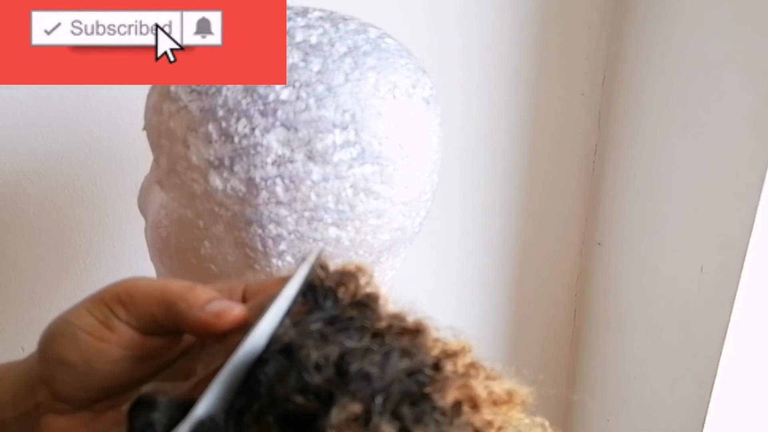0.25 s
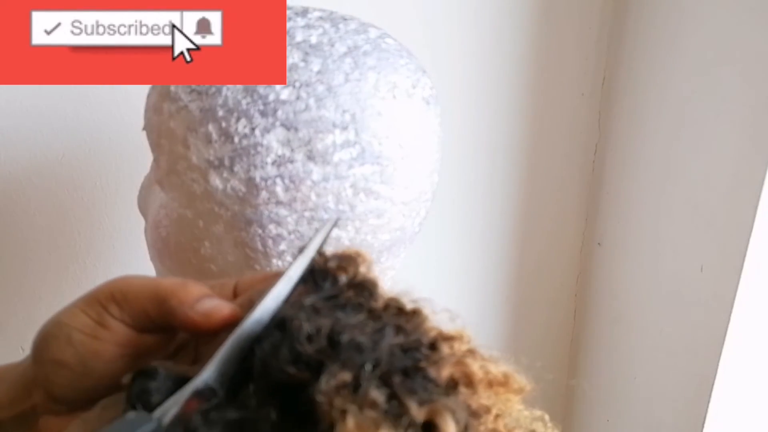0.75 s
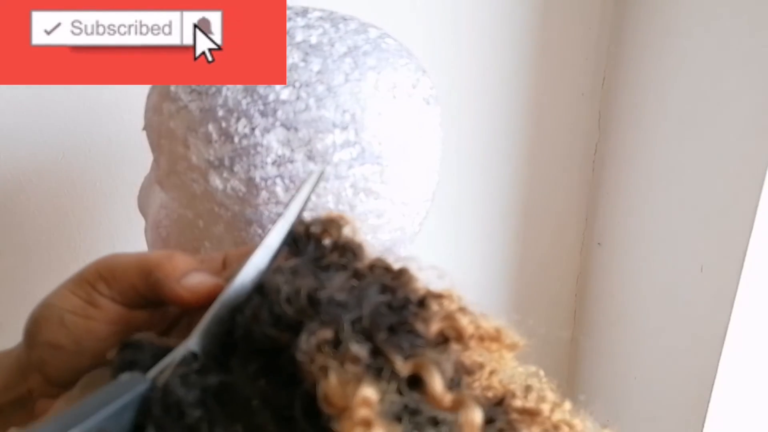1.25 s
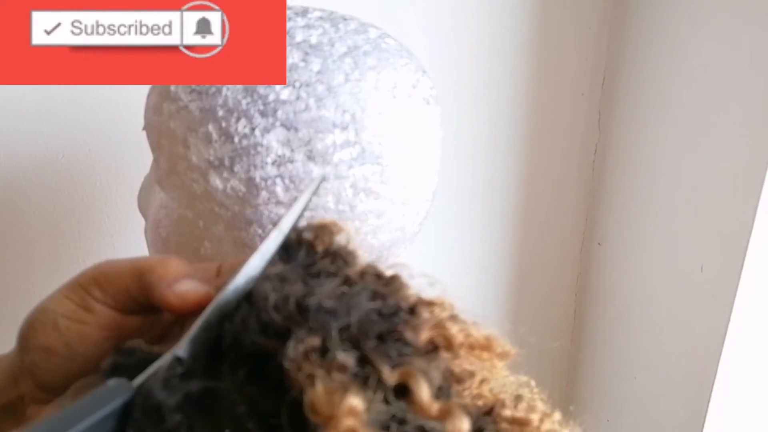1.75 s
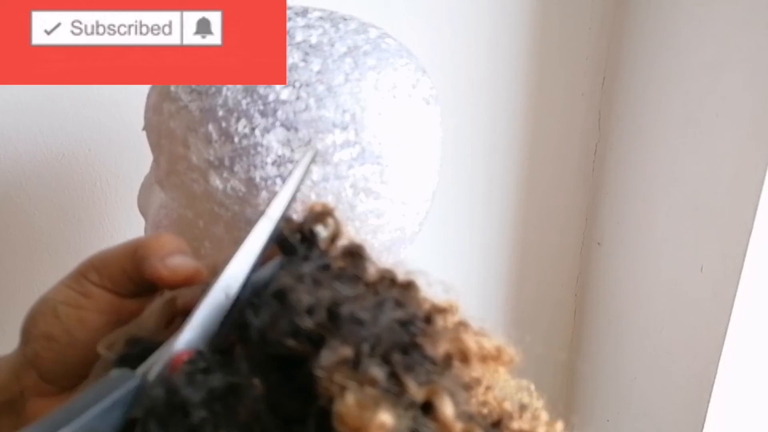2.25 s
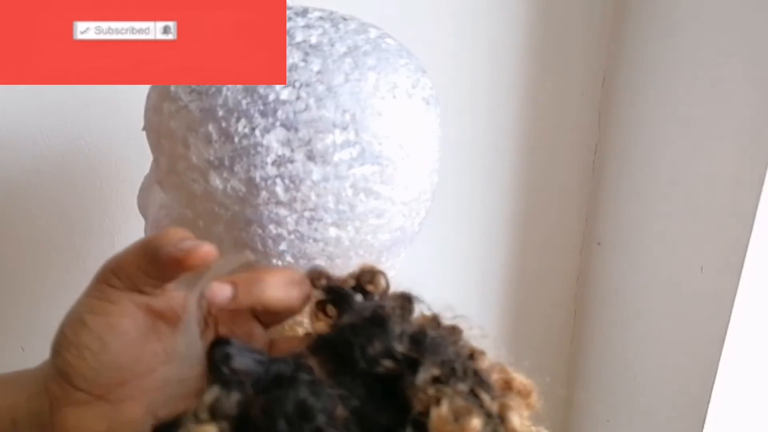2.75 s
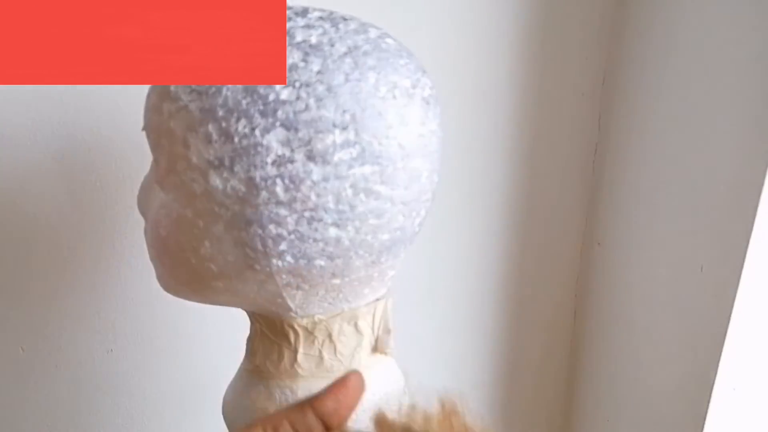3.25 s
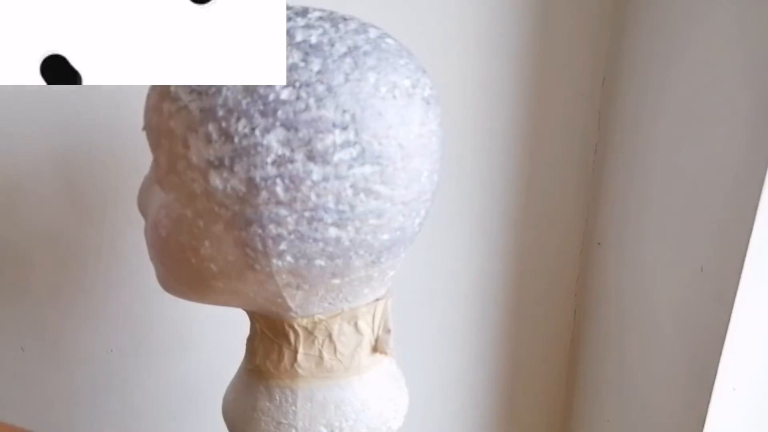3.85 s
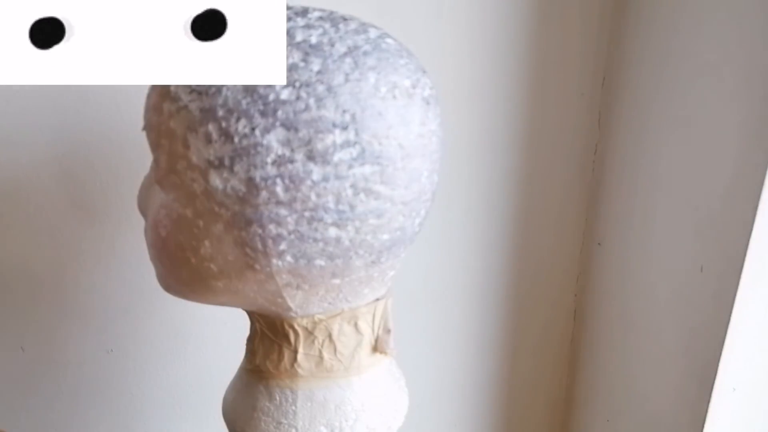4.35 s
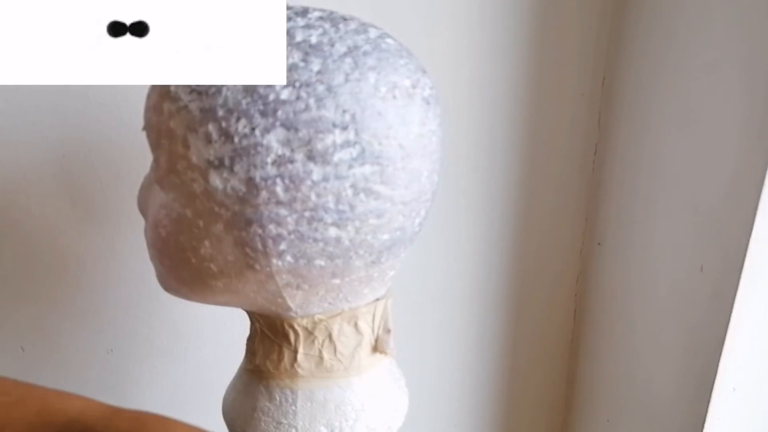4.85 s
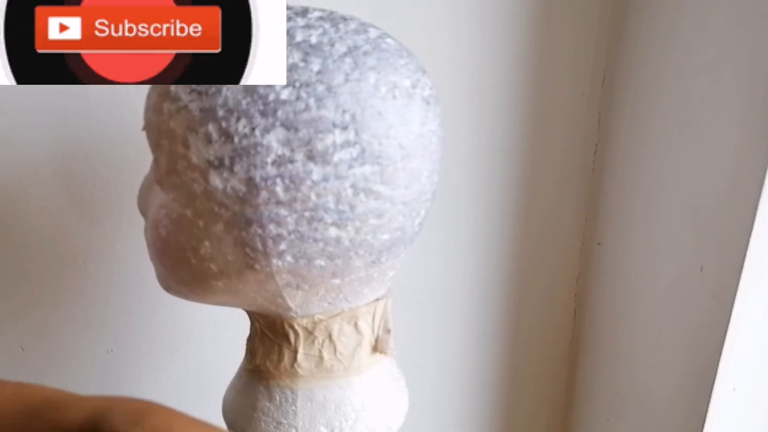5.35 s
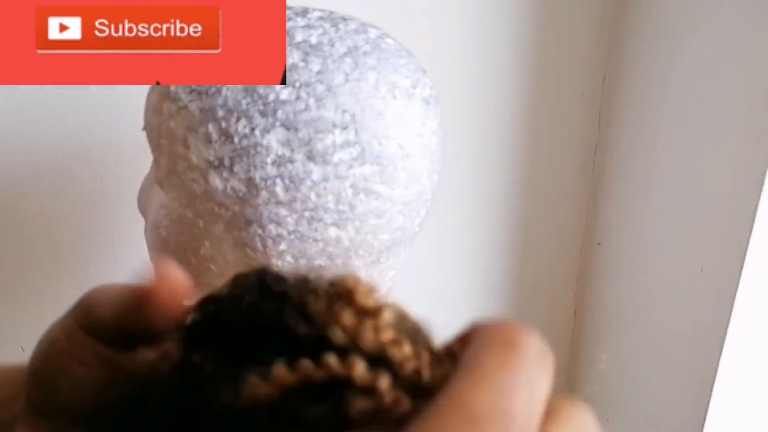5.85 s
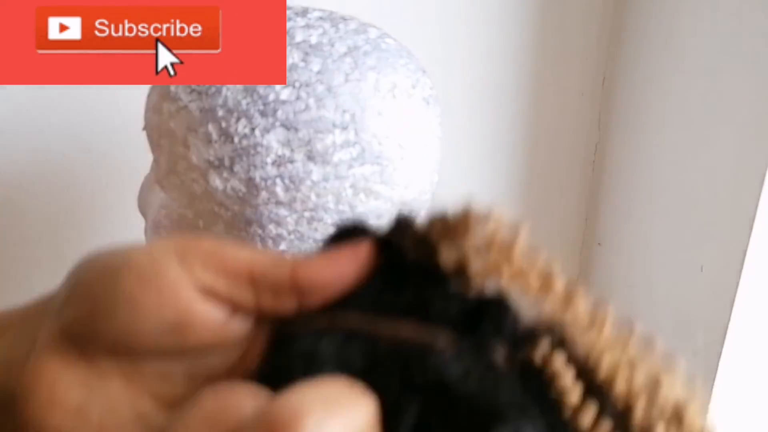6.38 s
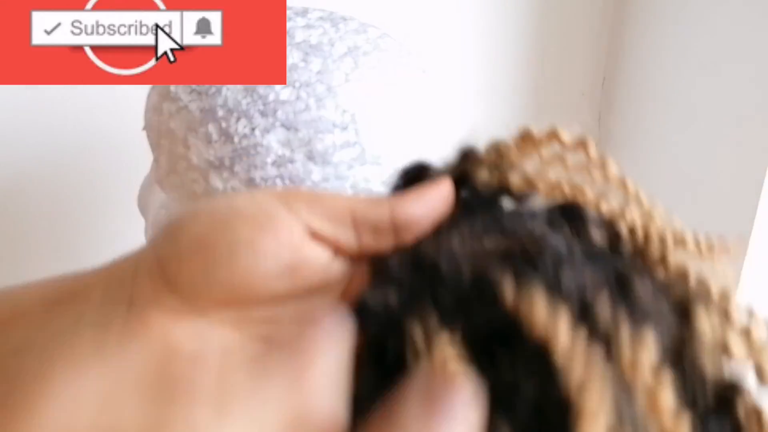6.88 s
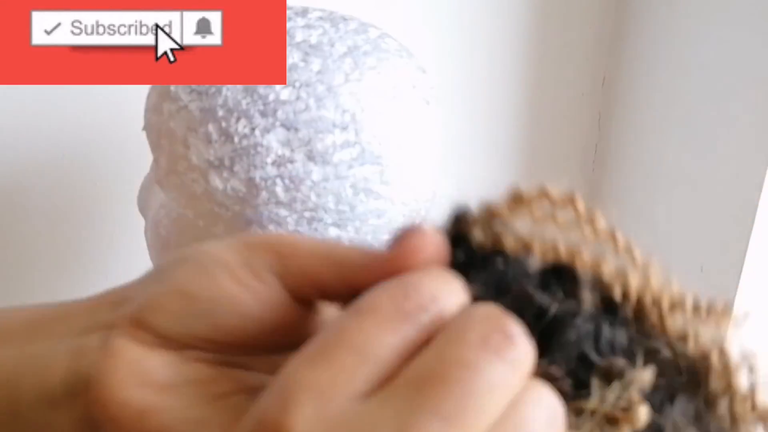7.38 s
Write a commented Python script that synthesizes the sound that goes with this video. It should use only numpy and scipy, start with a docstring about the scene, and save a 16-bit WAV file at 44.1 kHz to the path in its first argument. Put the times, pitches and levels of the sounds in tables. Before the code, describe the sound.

A quiet bare room holds a faint low rumble and even hiss, heard closely through a phone's two microphones. From 0 to 0.3 seconds hands rub softly, with a hollow scuff. Between 0.5 and 1.95 scissors nibble at lace: faint, dry treble crackles, small clicks and a brighter tick near 1.25, among dull scuffs and low bumps. At about 2.05-2.1 comes a far louder, sharp metallic snip. Airy hair rustles swell from 2.4 to 3.4, with a small click at 3.36, then near stillness. At 4.5 the scissors touch a hard top, chattering and skidding until 4.8; the hardest knock lands at 4.94, with two more just after, steel ringing over a low wooden-like boom. The ring fades. A light hair swish at 5.85 and soft strokes from 6.5 to 7.5 grow duller, with lace rubbing.

```python
"""Quiet, bare room: scissors trim the lace of a curly wig close to a phone.
Bites are crackle runs through treble blade resonances; thread snaps and pivot ticks are short clicks.
The scissors land on a hard top: chattering knocks ring steel modes, skids crackle, board modes boom.
Hands scuff, shift and stroke the wig: hollow rubs, low bumps, swells of hair and lace crackle.
Rumble and hiss lie beneath; the two microphone ports differ in treble resonance."""
import sys
import numpy as np
from scipy import signal
from scipy.fft import rfft, irfft, next_fast_len
from scipy.io import wavfile

SR = 44100
rng = np.random.default_rng(int(sys.argv[2]) if len(sys.argv) > 2 else 0)


def transcribe(signal):
    """Save signal, clipped to [-1, 1], as a 16-bit WAV file at the path in sys.argv[1]."""
    frames = np.atleast_2d(signal).T
    limited = np.clip(frames, -1, 1)
    pcm = np.round(limited * 32767).astype(np.int16)
    wavfile.write(sys.argv[1], SR, pcm)


N = 335953

# All table levels are relative: mix gains follow.
# blade bites through lace: (time [s], length [s], level [dB], most excited frequency [Hz])
BITES = [(.745, 0.026, -55, 6530), (0.872, 0.1155, -45.5, 8040), (1.055, .017, -50, 8700),
         (1.237, 0.0452, -49.5, 12000), (1.442, 0.089, -53, 8900), (1.546, .03, -46.5, 8560),
         (1.625, .035, -40.5, 8700), (1.915, 0.0553, -51, 8800), (2.059, 0.0397, -25, 6670),
         (2.114, 0.0159, -26.5, 6800)]
# thread snaps and pivot ticks: (time [s], level [dB], most excited frequency [Hz])
TICKS = [(0.5235, -54, 8000), (0.7565, -46.5, 6200), (0.8189, -51.5, 7470), (0.9493, -38, 8550),
         (1.226, -50, 7900), (1.2591, -31.5, 14480), (1.6526, -42.5, 9500), (2.0593, -27, 6550),
         (2.0904, -21.5, 6900), (2.3718, -43.5, 9100), (3.3606, -33.5, 5400), (6.7591, -48, 12000)]
# blade resonances: (frequency [Hz], width [Hz], level [dB])
BLADE_MODES = [(5410, 107, 3.5), (6230, 146, 11.5), (6750, 350, 7), (8136, 336, 0.5), (8667, 317, 2.5),
               (9364, 337, -21.5), (10170, 130, -14.5), (11270, 140, -12.5), (13563, 696, -18),
               (14670, 300, -8), (15260, 228, -8.5)]
# scissors meeting the hard top: (time [s], knock [dB], skid [dB], thud [dB])
BLOWS = [(4.5158, -22.5, -26, -45.5), (4.5692, -29.5, -38, -42), (4.647, -39.5, -39, -43.5),
         (4.7514, -30, -28.5, -34.5), (4.9424, -14, -31, -31), (5.0014, -22.5, -32, -28.5),
         (5.0383, -24, -34.5, -37)]
# steel modes of the landing scissors: (frequency [Hz], level [dB], t60 [s])
STEEL_MODES = [(1247, 8, 0.263), (1260.4, 1, 0.275), (1617, -16, 1.05), (1630, -14.5, 1.305),
               (1713.8, 4.5, 0.213), (1880, -18.5, 1.19), (2469, -1, 0.19), (2610.8, 2, 0.245),
               (2910, -4.5, 0.19), (3013, -2.5, 0.2742), (3090, 7.5, 0.2), (3266, -0.5, 0.18),
               (3403, 6.5, 0.195), (5973, -19, 0.2916), (6015, -1, 0.5), (6251, -14, 0.2624),
               (6584, 6, 0.325), (6960, 4, 0.39)]
# low modes of the hard top: (frequency [Hz], level [dB], t60 [s])
BOARD_MODES = [(223.2, -4.5, 0.286), (260.3, -2, 0.47), (268, 3, 0.474), (298.1, -2, 0.517),
               (331.8, -1.5, 0.603), (354.14, -0.5, 0.71), (387.7, -6, 0.525), (539, -10, 0.355),
               (640.6, -6.5, 0.26), (827.3, -6.5, 0.32)]
# knock spectrum: (frequency [Hz], density [dB per Hz])
KNOCK_SPECTRUM = [(100, -29.5), (300, -20), (700, -12.5), (1000, -17.5), (1250, -5.5), (1800, 1),
                  (2300, -1.5), (3150, 1), (3900, -7.5), (6500, -0.5), (8500, -12), (12000, -21),
                  (16000, -18)]
# skid spectrum: (frequency [Hz], density [dB per Hz])
SKID_SPECTRUM = [(150, -25), (500, -4.5), (1000, -7), (3000, -15.5), (4000, -11), (5200, -1), (6600, 1.5),
                 (7600, -5.5), (8700, 0.5), (11000, -11.5), (13000, -17), (16000, -22)]
# dull rubs of hands and handles: (time [s], t60 [s], level [dB], resonance [Hz], rasp [dB])
SCUFFS = [(.03, 0.74, -59, 912, -2), (.1475, 0.16, -42, 787, -8), (.72, .22, -57.5, 999, -3.5),
          (1.317, 0.63, -62.5, 783, 10.5), (1.435, 0.458, -49.5, 780, -3), (1.812, 0.76, -56, 1127, 3.5),
          (1.914, 0.217, -46.5, 896, -4), (2.86, 0.796, -53, 540.6, -2), (3.44, 1.49, -60, 624, -3),
          (7.125, 1.2, -60.5, 1477, -7.5), (7.19, 1.07, -59, 640, -4.5)]
# hands sliding over hair: (time at full speed [s], swell [s], hold [s], level [dB], pressure [0-1])
STROKES = [(0.032, 0.066, 0.035, -61.5, 0.63), (0.163, 0.0147, 0.08, -60, 0.28),
           (2.45, 0.066, 0.132, -57, 0), (2.679, 0.1024, 0.0468, -49, 0.21),
           (2.821, 0.039, 0.1195, -52, 0.59), (3.169, 0.075, 0.076, -59.5, 0.44),
           (3.282, 0.0377, 0.0445, -43, 0), (3.355, 0.024, 0.0231, -42.5, 0.26),
           (4.043, 0.017, 0.007, -56, 0.27), (4.452, 0.083, 0.029, -66, 0.92),
           (4.926, 0.0183, .01, -51, 0.51), (5.6, 0.075, 0.13, -68, 0.79), (5.85, 0.0337, 0.1147, -49, 0),
           (6.5, 0.1236, 0.1526, -55, 0.19), (6.768, .01, 0.0158, -56.5, 0.31),
           (7.061, 0.1104, 0.058, -51.5, 0.74), (7.191, 0.056, 0.0446, -54, 0.83),
           (7.349, 0.073, 0.29, -64, .85)]
# sliding-hair spectrum: (frequency [Hz], density [dB per Hz])
HAIR_SPECTRUM = [(1000, -57), (3100, -9.5), (3900, -12.5), (5200, -3), (6700, 1.5), (7800, -7), (9000, 2),
                 (11000, -11), (13500, -13.5), (15000, -9), (16000, -21)]
# rubbed-lace spectrum: (frequency [Hz], density [dB per Hz])
LACE_SPECTRUM = [(200, -18.5), (600, 6), (1000, -1), (1500, 0.5), (2000, -1), (2400, 1.5), (3300, -0.5),
                 (4000, -13), (7000, -1), (12000, -15.5)]
# soft low bumps of hands on the wig: (time [s], length [s], level [dB])
BUMPS = [(.02, 0.1223, -52.5), (1.346, .39, -57), (1.841, .18, -53), (2.048, 0.604, -60.5)]
# background spectrum: (frequency [Hz], density [dB per Hz])
QUIET_SPECTRUM = [(12, -23.5), (20, -2.5), (123, -4), (198, -12), (241, -6.5), (499, -13.5), (590, -15.5),
                  (718, -16), (3160, -26), (3740, -31.5), (6540, -20.5), (7520, -28.5), (8890, -27.5),
                  (14700, -36.5), (16000, -29)]
# low rumble of the room: (time [s], level [dB])
MURMUR_LEVEL = [(0, 6), (1.0, 3), (4.3, 4), (4.8, 1.5), (7.6, 1.5)]
# microphone ports: (frequency [Hz], left minus right [dB])
PORT_DIFFERENCE = [(100, .5), (400, 2.5), (1300, 1), (3000, 1.5), (5000, -2), (6500, -10.5), (7700, -1.5),
                   (9000, 18), (10500, 6.5), (12500, -0.5), (15000, -3.5)]

GRAZE_S, GRAZE_DB, GRAZE_T60_S = .06, -5.5, 0.132  # soft graze before the bite
EASE_DB, RELEASE_T60_S = -4.5, 0.0264  # EASE_DB: change over one bite length
EDGE_SHARE, EDGE_MAX_HZ = .72, 5720  # lower edge of blade sound: share of the bite frequency, limit
CHATTER_GAP_S, CHATTER_DB, CHATTER_LOSS_DB = .009, -11, -3  # mean gap, first level, step per contact
SKID_RISE_S, SKID_T60_S, SLITHER_DB, SLITHER_T60_S = 0.0056, 0.0707, -16, 0.232
THUD_RISE_S = 0.021
SCUFF_RISE_SHARE = 0.0188  # rise time over t60
STROKE_FADE_S = 0.0552
BRIGHTNESS_DB_PER_OCTAVE, LACE_DB = (3, -3), (-32.5, 2)  # at pressure 0, at pressure 1
QUIET_DB = -58.5
ROOM_T60_S, TREBLE_T60_S = 0.6194, 0.416
TOP_HZ = 15900


def cutting(left_db=5, mesh_db=-27, snap_db=-13):
    """Threads part in quick runs, louder at left; mesh adds a faint duller crunch, threads dry snaps."""
    out = np.zeros((2, N))
    mesh_response = filtered(np.eye(1, 256), [1500, 3500], "band")
    for time_s, length_s, db, focus_hz in BITES:
        force = bite(length_s)
        run = crackle(len(force), spread_db=3.0) * catches(len(force), spread_db=2.5) * force
        crunch = undb(mesh_db) * through(run, mesh_response)
        add(out, time_s - GRAZE_S, undb(db) * (blades(run, focus_hz, focus_db=20.5) + crunch))
    for time_s, db, focus_hz in TICKS:
        tick = undb(db + 6.0) * click(seconds(.03), t60_s=0.0078)
        snap = undb(snap_db) * filtered(tick, 5000, "high")
        add(out, time_s, blades(tick, focus_hz, focus_db=26.0) + snap)
    balance = undb(np.array([[left_db], [-left_db]]) / 2)
    return nearby(out, db=-5.5, t60_s=0.048) * balance


def bite(length_s):
    """Blade force from GRAZE_S before the bite: growing graze, full force easing off, release."""
    t = seconds(GRAZE_S + length_s + .04) - GRAZE_S
    graze = undb(GRAZE_DB) * fade(np.abs(t), GRAZE_T60_S)
    cut = undb(EASE_DB * t / length_s) * fade(np.maximum(t - length_s, 0), RELEASE_T60_S)
    return np.where(t < 0, graze, cut)


def catches(size, spread_db, count=130):
    """Blades catch thread after thread: a new strength every count samples, about 3 ms."""
    strength = undb(spread_db * rng.standard_normal(size // count + 1))
    return unit(np.repeat(strength, count)[:size])


def blades(x, focus_hz, focus_db):
    """Blades ring briefly in the treble; the bite frequency sets their lower edge and favoured modes."""
    t = seconds(.015)
    hz, width_hz, db = np.transpose(BLADE_MODES)[:, :, None]
    octaves_off = np.abs(np.log2(hz / focus_hz))
    gain = width_hz * undb(db - focus_db * octaves_off)
    modes = gain * np.exp(-np.pi * width_hz * t) * np.cos(2 * np.pi * hz * t)
    edge_hz = min(EDGE_SHARE * focus_hz, EDGE_MAX_HZ)
    return through(x, filtered(np.sum(modes, axis=0), edge_hz, "high", order=8)[None])


def clatter(steel_db=-12, knock_db=5.0, skid_db=3.0, boom_db=-5):
    """Blades and handles land in turn, chatter, ring, skid a little and set the top booming."""
    knocks, slides, boom = np.zeros((3, 2, N))
    t = seconds(.7)
    braked_s = np.maximum(t - SKID_RISE_S, 0)
    slither = undb(SLITHER_DB) * fade(braked_s, SLITHER_T60_S)
    skid = np.minimum(t / SKID_RISE_S, 1) * (fade(braked_s, SKID_T60_S) + slither)
    thud_rise = np.minimum(t / THUD_RISE_S, 1)
    for time_s, hit_db, slide_db, thud_db in BLOWS:
        for delay_s, db in chatter():
            contact = click(seconds(.05), t60_s=0.0174)
            add(knocks, time_s + delay_s, undb(hit_db + knock_db + db) * contact)
        add(slides, time_s, undb(slide_db + skid_db) * crackle(len(t), spread_db=3.0) * skid)
        thud = ring(t, BOARD_MODES, spread_rad=0.22) * thud_rise
        add(boom, time_s, undb(thud_db + boom_db) * thud)
    knocks = colour(knocks, KNOCK_SPECTRUM)
    steel = undb(steel_db) * through(knocks, ring(t, STEEL_MODES, spread_rad=1.396))
    skids = nearby(colour(slides, SKID_SPECTRUM), db=-9.5, t60_s=0.054, alike=0.32)
    return room(knocks, wet_db=-3.5) + room(skids, wet_db=-1) + steel + boom


def chatter(count=5):
    """A blow and its weaker, unevenly spaced after-contacts: (delay [s], level [dB])."""
    delays_s = np.cumsum(CHATTER_GAP_S * rng.uniform(.5, 1.5, count))
    return [(0, 0), *zip(delays_s, CHATTER_DB + CHATTER_LOSS_DB * np.arange(count))]


def rustle(hiss_db=2.5):
    """Hairs slip over each other; firmer strokes are duller and also rub the lace cap."""
    out = np.zeros((2, N))
    for time_s, swell_s, hold_s, db, pressure in STROKES:
        t = seconds(.8) - min(time_s, .3)  # 0 at full speed
        rise = (np.minimum(t, 0) / swell_s) ** 2
        fall = (np.maximum(t - hold_s, 0) / STROKE_FADE_S) ** 2
        speed = np.exp(-rise - fall)
        tilt_db = np.interp(pressure, (0, 1), BRIGHTNESS_DB_PER_OCTAVE)
        lace_db = np.interp(pressure, (0, 1), LACE_DB)
        hair = colour(crackle(len(t), spread_db=2.0), HAIR_SPECTRUM, tilt_db)
        lace = colour(crackle(len(t), spread_db=2.0), LACE_SPECTRUM)
        add(out, time_s + t[0], undb(db + hiss_db) * speed * (hair + undb(lace_db) * lace))
    return nearby(out, db=-9.0, t60_s=0.077)


def scuffs():
    """Short rubs: band noise as a hollow resonance, with a rasp of lace; slow rubs start slowly."""
    out, t = np.zeros((2, N)), seconds(.7)
    for time_s, t60_s, db, hz, rasp_db in SCUFFS:
        hollow = unit(filtered(noise(len(t), alike=0.423), [hz / 1.214, hz * 1.122], "band"))
        rasp = colour(crackle(len(t), spread_db=3.5), LACE_SPECTRUM)
        rise_s = SCUFF_RISE_SHARE * t60_s
        shape = np.minimum(t / rise_s, 1) * fade(np.maximum(t - rise_s, 0), t60_s)
        add(out, time_s, undb(db) * shape * (hollow + undb(rasp_db) * rasp))
    return out


def handling():
    """The weight of the wig shifts in the hands: dull swells of low band noise."""
    out = np.zeros((2, N))
    for time_s, length_s, db in BUMPS:
        size = int(length_s * SR)
        rumble = unit(filtered(noise(size, alike=1.0), [30, 150], "band"))
        add(out, time_s, undb(db) * rumble * signal.windows.hann(size))
    return out


def still_air(low_db=0, hiss_db=2.0, split_hz=1800):
    """A low rumble from the left, late at the right port, under an even hiss."""
    left, right = filtered(colour(noise(N, alike=0.407), QUIET_SPECTRUM), split_hz, "low")
    murmur = np.array([left, np.roll(right, 19)])  # lag in samples
    hiss = filtered(colour(noise(N), QUIET_SPECTRUM), split_hz, "high")
    swell_db = np.interp(np.arange(N) / SR, *np.transpose(MURMUR_LEVEL))
    return undb(QUIET_DB) * (undb(low_db + swell_db) * murmur + undb(hiss_db) * hiss)


def room(x, wet_db):
    """Direct sound plus diffuse tail of bare walls: bass alike at both ports, treble dies first."""
    t = seconds(.8)
    bass = filtered(noise(len(t), 1.0), 842.0, "low")
    middle = filtered(noise(len(t), 0.159), [700, 3500], "band")
    treble = filtered(noise(len(t), 0), 2650.0, "high")
    tail = (bass + middle) * fade(t, ROOM_T60_S) + treble * fade(t, TREBLE_T60_S)
    return x + undb(wet_db) * through(x, tail * np.minimum(t / 0.0011, 1))


def nearby(x, db, t60_s, alike=0):
    """Quick reflections from close things comb the sound in a fixed pattern."""
    t = seconds(.06)
    reflections = through(x, noise(len(t), alike) * fade(t, t60_s))
    return (x + undb(db) * reflections) / np.hypot(1, undb(db))


def crackle(size, spread_db, count=12):
    """Tiny slips of very unequal strength, each count samples long."""
    strength = undb(spread_db * np.minimum(rng.exponential(size=size // count + 1), 5))
    return unit(noise(size) * np.repeat(strength, count)[:size])


def click(t, t60_s):
    """Sharp contact from whitened, refaded noise, with the energy of 1 ms at 0 dB."""
    spectrum = rfft(noise(len(t)) * fade(t, t60_s))
    burst = irfft(spectrum / np.abs(spectrum), len(t)) * fade(t, 2 * t60_s)
    return burst * np.sqrt(SR / 1000 / np.sum(burst ** 2, axis=1, keepdims=True))


def ring(t, modes, spread_rad):
    """Decaying modes with random phases, out of step between the ports."""
    hz, db, t60_s = np.transpose(modes)[:, :, None]
    phase = rng.uniform(0, 2 * np.pi, hz.shape) + spread_rad * rng.standard_normal((2, len(hz), 1))
    waves = undb(db) * fade(t, t60_s) * np.sin(2 * np.pi * hz * t + phase)
    return waves.sum(axis=1) / np.linalg.norm(undb(db))


def noise(size, alike=0):
    """Stereo noise with a power share common to both ports."""
    left, right, both = rng.standard_normal((3, size))
    alike = np.clip(alike, 0, 1)
    return np.sqrt(1 - alike) * np.array([left, right]) + np.sqrt(alike) * both


def colour(x, points, tilt_db=0, size=4096):
    """Minimum-phase filter shaped like a spectrum, tilted in dB per octave."""
    hz = np.fft.rfftfreq(size, 1 / SR)
    cepstrum = irfft(np.log(undb(along(hz, points) + tilt_db * np.log2(hz + 1))))
    cepstrum[1:size // 2] *= 2
    cepstrum[size // 2 + 1:] = 0
    return through(x, irfft(np.exp(rfft(cepstrum)))[None])


def along(hz, points):
    """Read a spectrum in dB on a log-frequency axis."""
    f, db = np.transpose(points)
    return np.interp(np.log(hz + 1), np.log(f), db)


def through(x, response):
    """Pass each channel through its response, scaled to unit energy."""
    response = response / np.linalg.norm(response, axis=1, keepdims=True)
    return signal.oaconvolve(x, response, axes=1)[:, :x.shape[1]]


def filtered(x, edges_hz, kind, order=2):
    """Butterworth filter."""
    return signal.sosfilt(signal.butter(order, edges_hz, kind, fs=SR, output="sos"), x)


def add(track, time_s, sound):
    """Mix a sound into the track, cut at its end."""
    start = int(time_s * SR)
    track[:, start:start + sound.shape[1]] += sound[:, :N - start]


def undb(db):
    """Decibels to amplitude."""
    return 10 ** (np.asarray(db) / 20)


def unit(x):
    """Scale to rms 1."""
    return x / np.sqrt(np.mean(x ** 2))


def seconds(length_s):
    """Time axis in seconds."""
    return np.arange(int(length_s * SR)) / SR


def fade(t, t60_s):
    """Exponential decay, 60 dB per t60."""
    return undb(-60 * t / t60_s)


def scene():
    """Cutting, landing knocks, skids, strokes and scuffs with room; ring, boom, bumps, rumble, hiss dry."""
    scissors = room(cutting(), wet_db=-9.5) + clatter()
    hands = room(rustle(), wet_db=-9.5) + room(scuffs(), wet_db=-8.5) + handling()
    return scissors + hands + still_air()


def record(dry, ceiling=0.39):
    """The right port resonates lower than the left; the phone rounds loud peaks and cuts the top."""
    size = next_fast_len(N + 2048)
    ratio = undb(along(np.fft.rfftfreq(size, 1 / SR), PORT_DIFFERENCE))
    gains = np.array([ratio, np.ones_like(ratio)]) * np.sqrt(2 / (1 + ratio ** 2))  # total power kept
    heard = irfft(rfft(dry, size) * gains, size)[:, :N]
    rounded = ceiling * np.tanh(heard / ceiling)
    return signal.sosfilt(signal.ellip(10, .2, 70, TOP_HZ, fs=SR, output="sos"), rounded)


dry = scene()
out = record(dry)
transcribe(out)
```